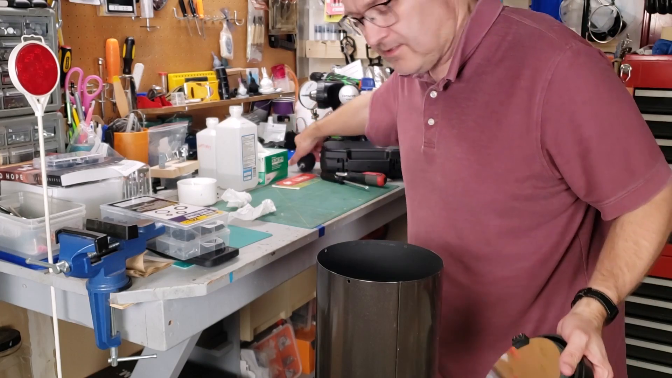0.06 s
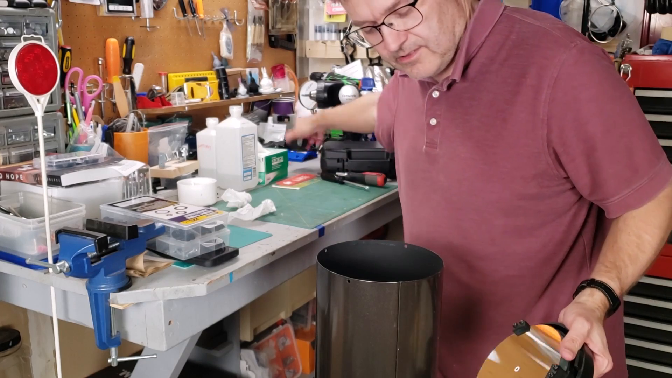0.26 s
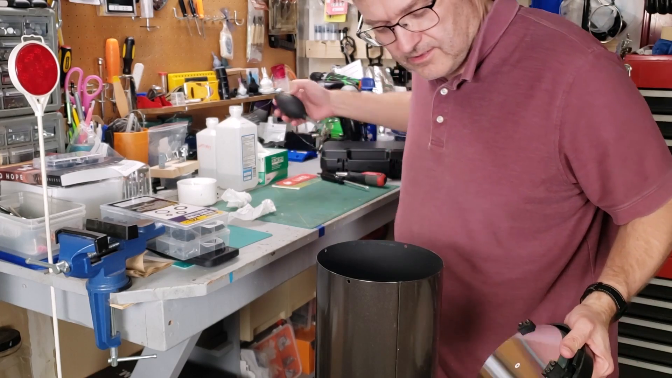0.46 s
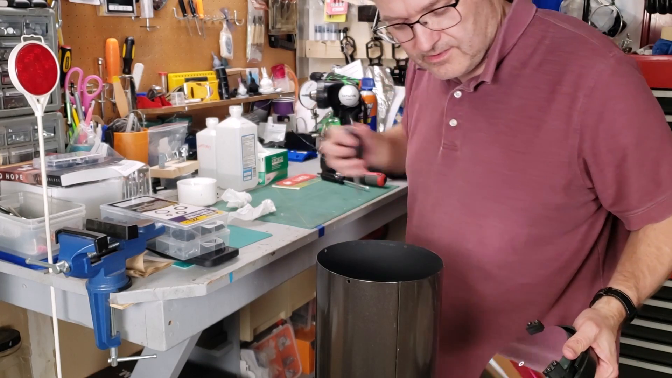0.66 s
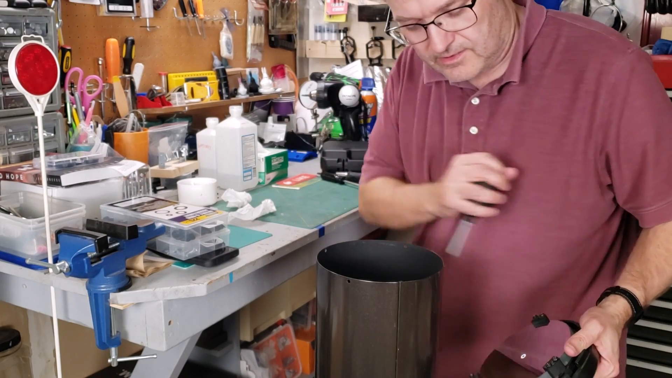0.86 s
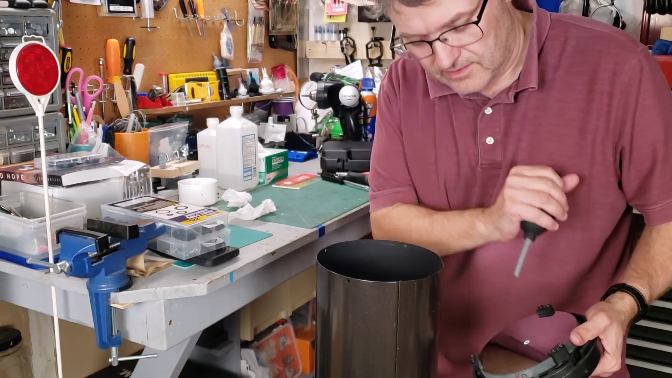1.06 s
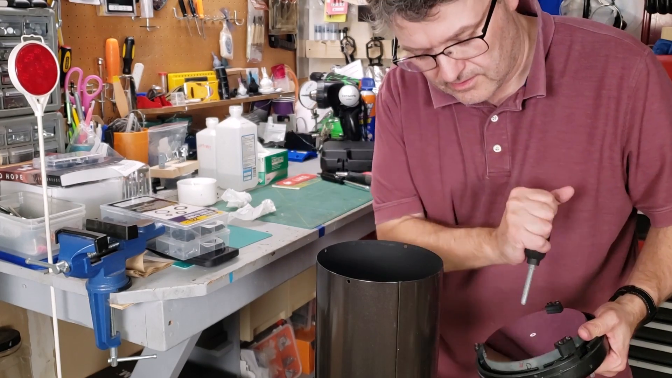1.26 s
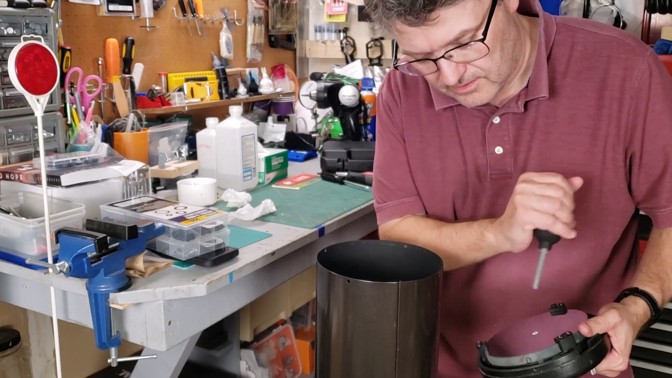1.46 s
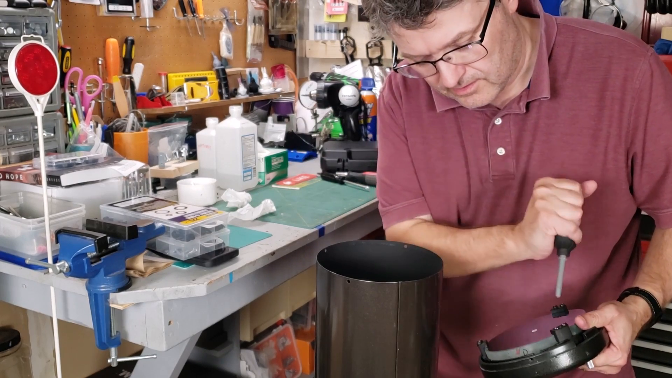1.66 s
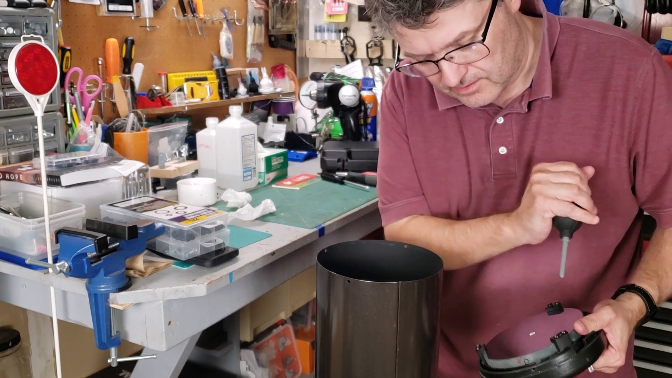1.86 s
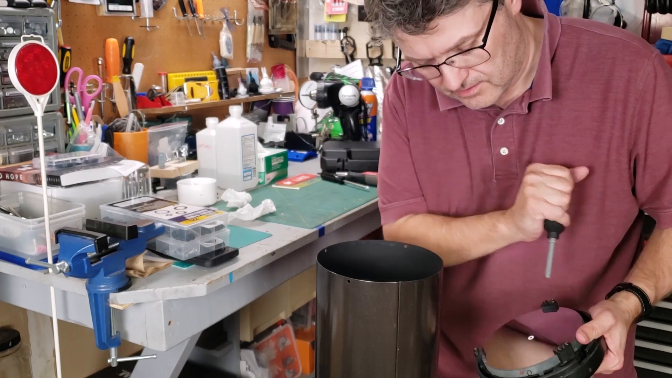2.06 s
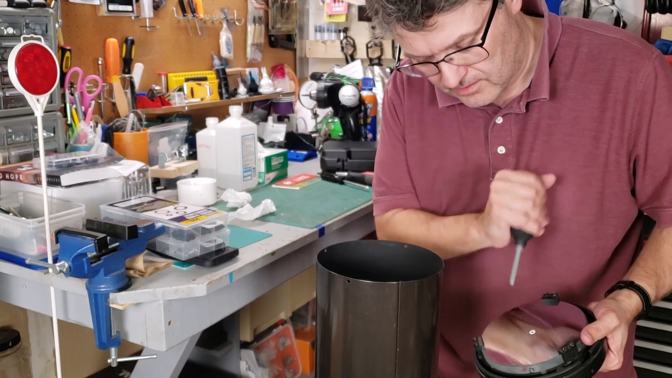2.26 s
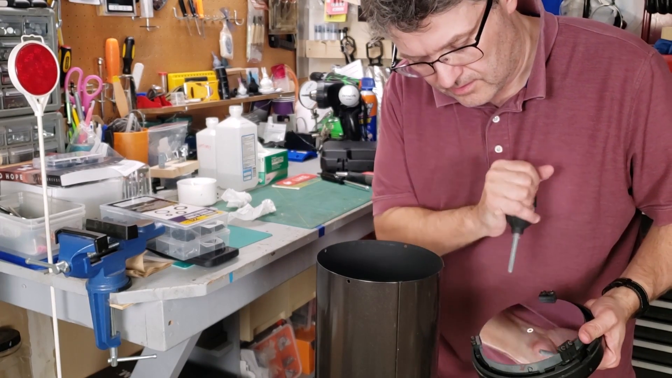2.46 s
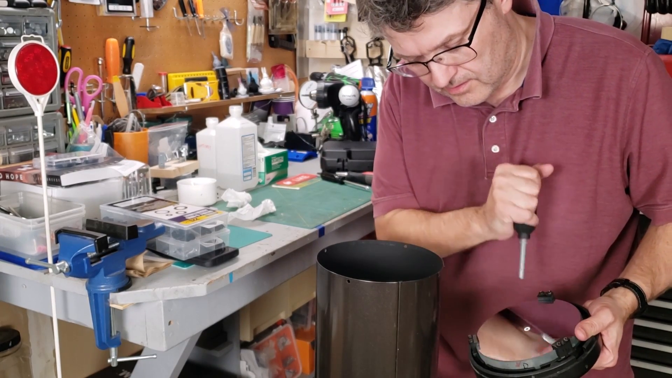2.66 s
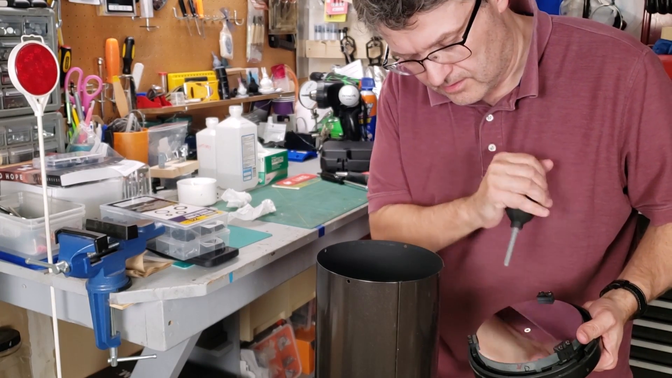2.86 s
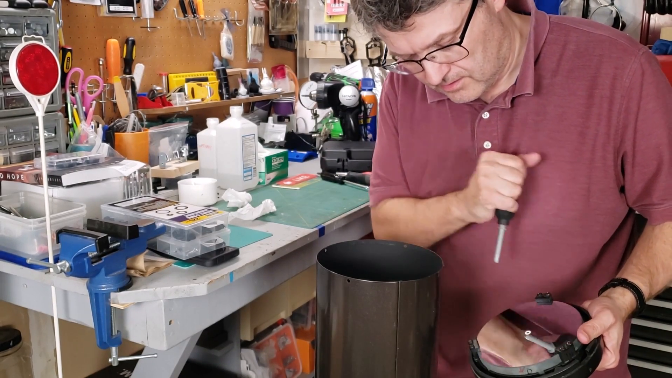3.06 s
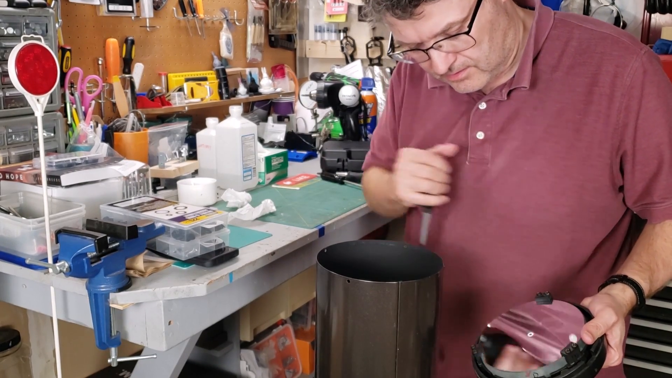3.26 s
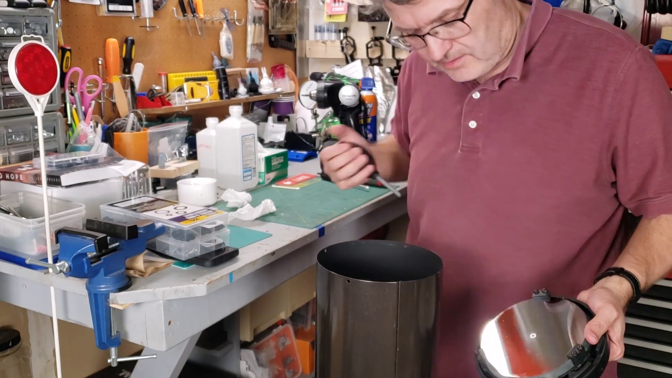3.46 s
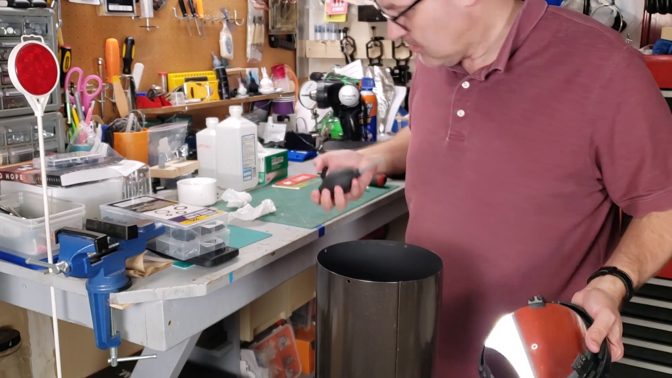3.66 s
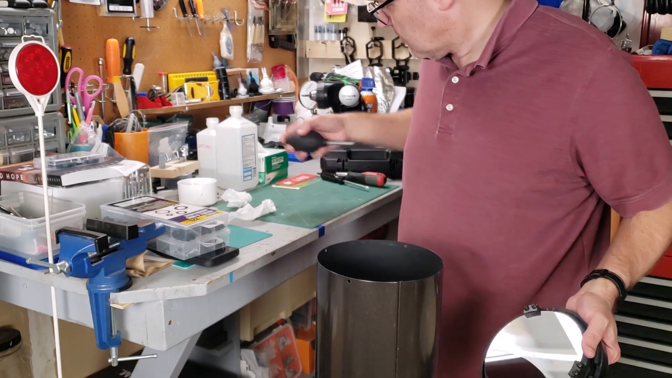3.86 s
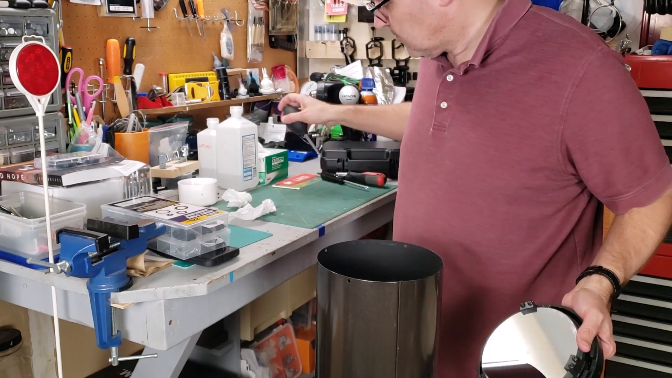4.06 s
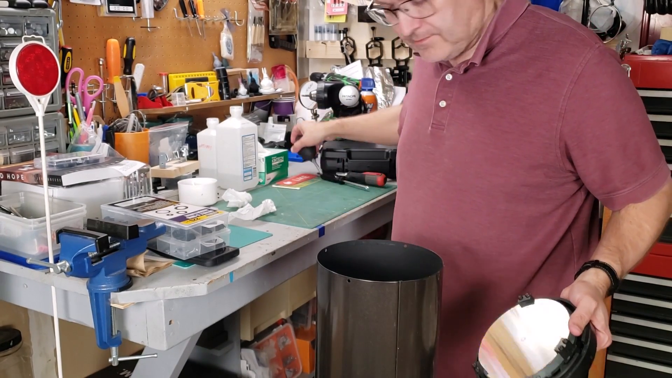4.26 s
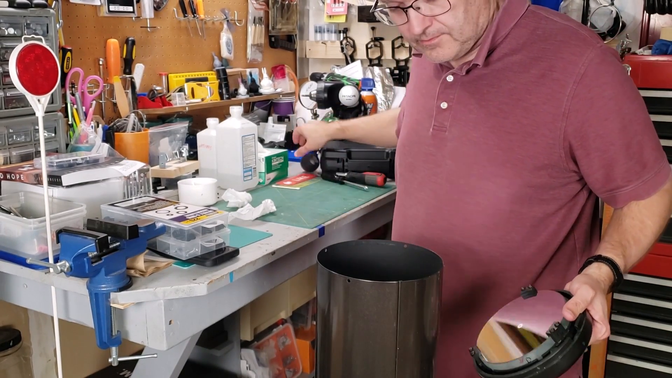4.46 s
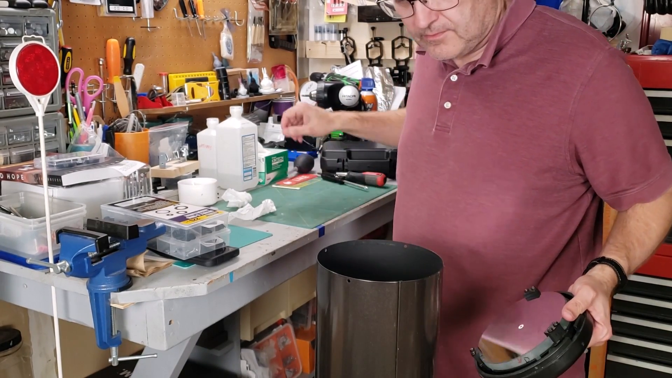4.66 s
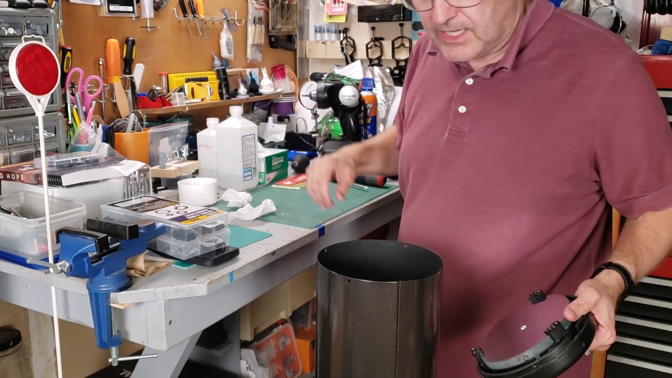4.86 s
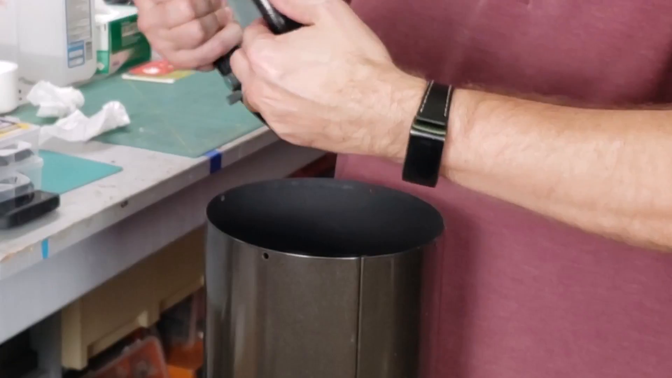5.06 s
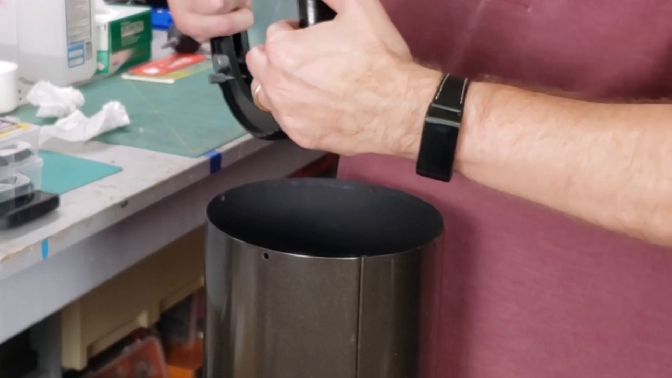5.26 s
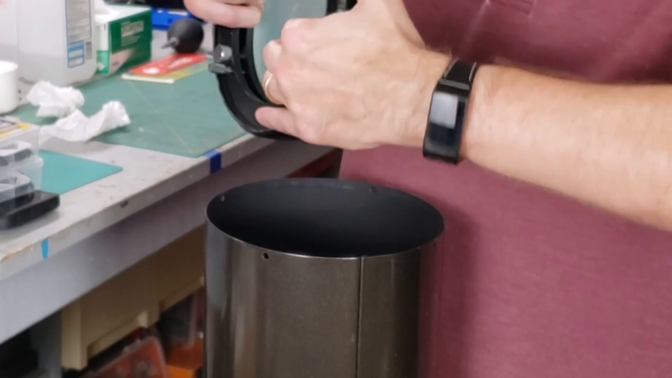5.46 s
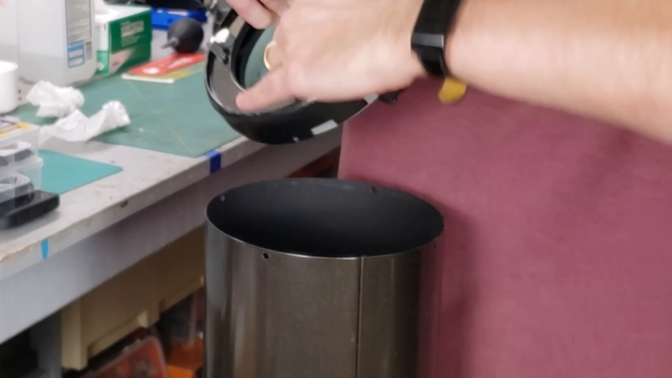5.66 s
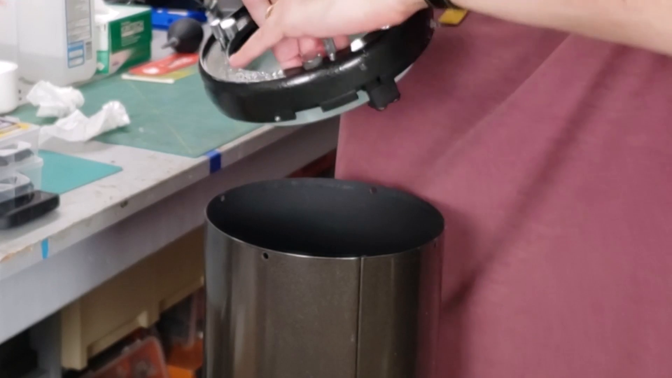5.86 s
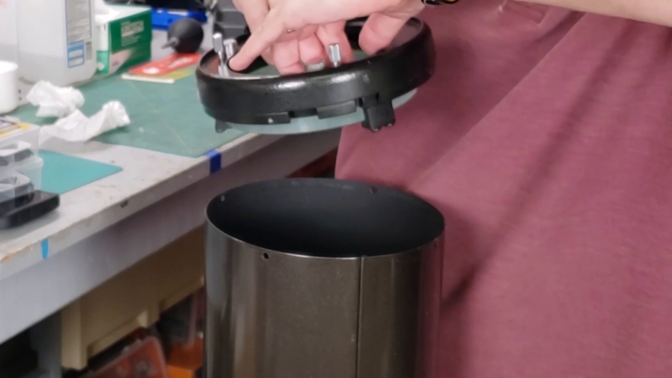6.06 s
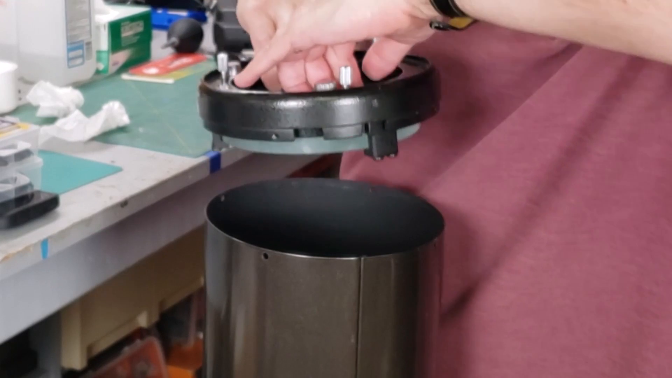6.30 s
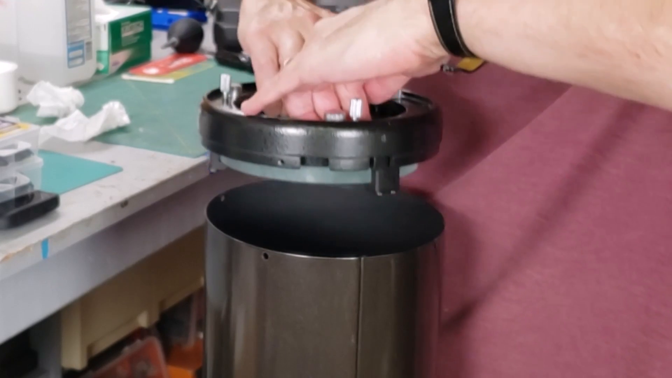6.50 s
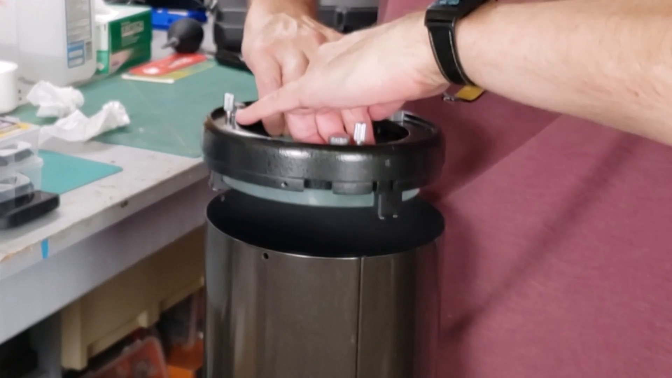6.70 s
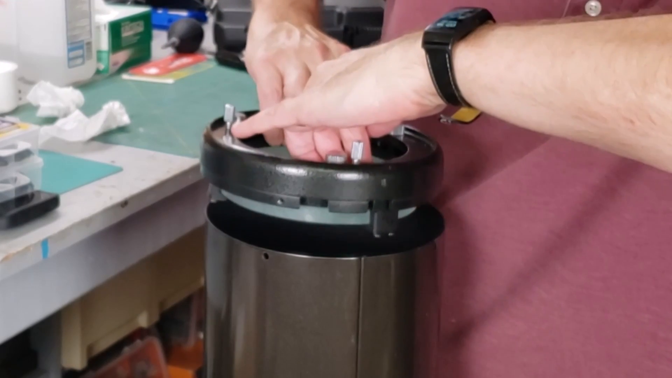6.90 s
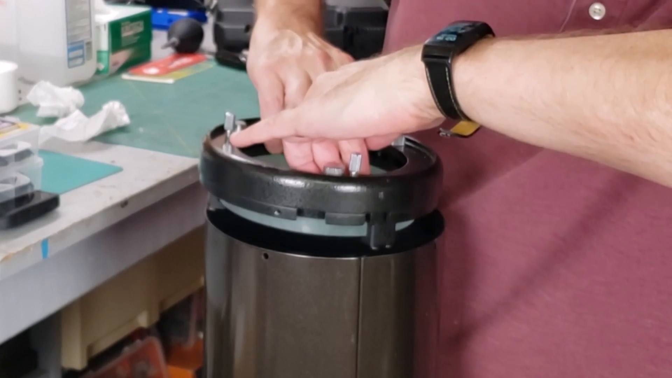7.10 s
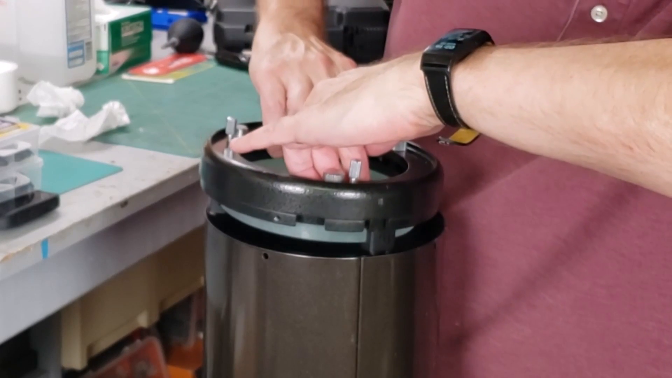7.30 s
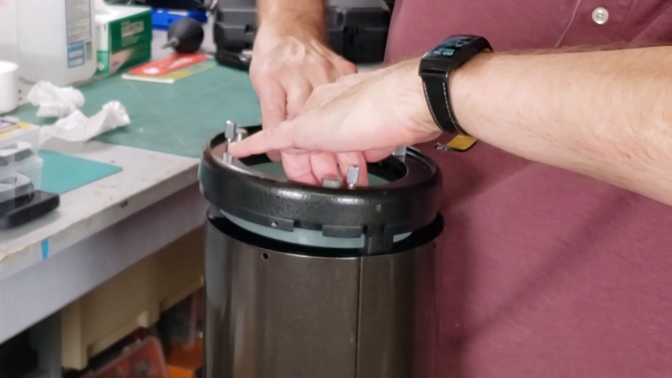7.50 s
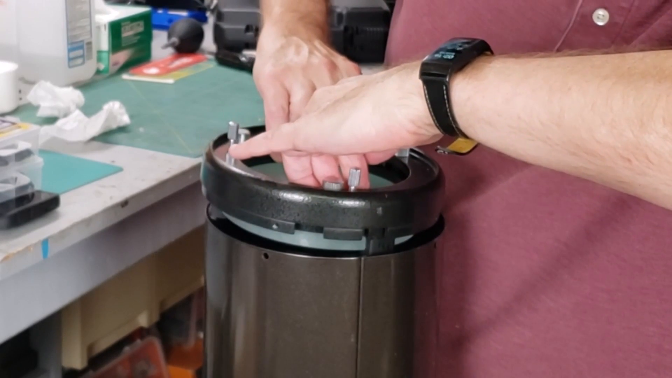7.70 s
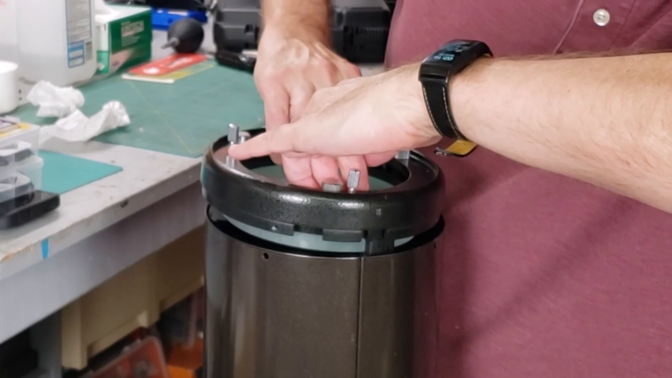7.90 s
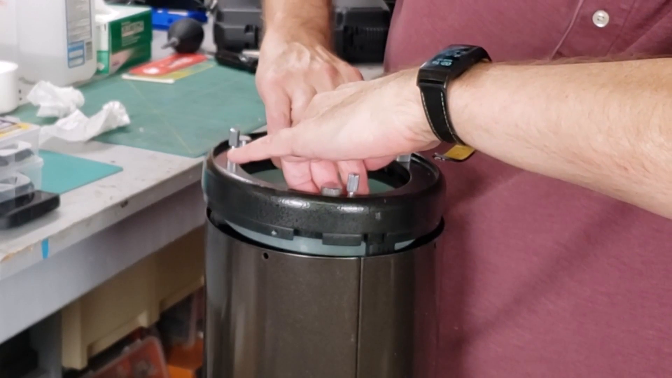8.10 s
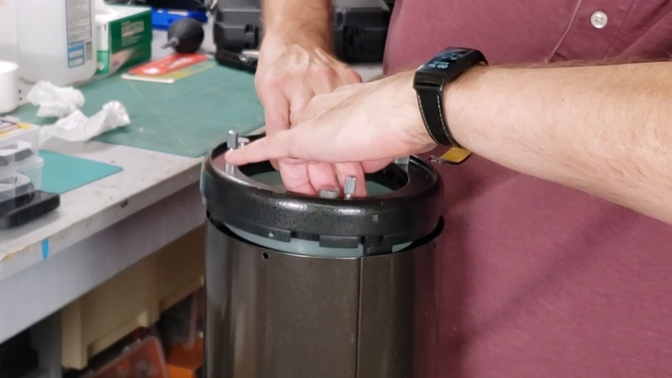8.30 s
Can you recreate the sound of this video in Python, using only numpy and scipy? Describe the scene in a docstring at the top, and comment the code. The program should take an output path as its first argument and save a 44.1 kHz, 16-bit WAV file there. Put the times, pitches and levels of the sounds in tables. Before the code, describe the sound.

In a quiet workshop, a squeezed blower whistles and hisses six times, clatters back onto the bench, and later a part rubs hollowly into a tube.

```python
"""A rubber air bulb is squeezed in quick puffs over a mirror, in stereo in a small, quiet workshop.
Each squeeze whistles as a wavering nozzle tone over jet noise; each refill is an arch of intake hiss.
Fetching it and putting it back knock on the bench: decaying modes, clacks and snaps, then a short slide.
Last, the mirror's holder rubs into a metal tube: scrape noise and the tube's resonances.
Every source reaches two microphones directly and by the room's echo, over a steady room tone."""
import sys
import numpy as np
from scipy import signal
from scipy.fft import rfft, irfft
from scipy.io import wavfile
from scipy.ndimage import uniform_filter1d, minimum_filter1d

SR = 44100
rng = np.random.default_rng(int(sys.argv[2]) if len(sys.argv) > 2 else 0)


def inscribe(sig):
    """Save sig as 16-bit PCM at rate SR to the path in sys.argv[1].

    A 1-D sig is mono; a 2-D sig holds one channel per row.
    Samples are clipped to [-1, 1] before scaling.
    """
    pcm = np.round(np.clip(np.atleast_2d(sig).T, -1, 1) * 32767)
    wavfile.write(sys.argv[1], SR, pcm.astype(np.int16))


N = 367794

# Source levels are set ahead of the microphone placing; levels in mode and colour tables are relative.
# echo decay of the shop: (frequency [Hz], time to fall 60 dB [s])
ECHO_DECAY = [(100, 0.9), (500, 0.23), (2000, 0.17), (4500, .31), (7000, 0.3), (15000, 0.19)]
# colour of the room tone: (frequency [Hz], level per Hz [dB])
ROOM_COLOUR = [(25, -11), (50, -1), (125, -3), (185, -16), (260, -19), (370, -18), (450, -22), (900, -21.5),
               (1250, -15), (1900, -19), (2900, -27), (8500, -38), (12000, -29.5), (16000, -27)]
# how alike the room tone is at left and right: (frequency [Hz], likeness [0-1])
LEFT_RIGHT_LIKENESS = [(40, .8), (300, .75), (900, 1), (2000, .2), (8000, .05)]
# knocks on the bench: (time [s], thump level [dB], ring level [dB], ring centre [Hz],
#   clack level [dB], clack top [Hz], snap level [dB])
BENCH_KNOCKS = [(.002, -37, -25, 410, -41.5, 1960, -90), (.022, -63, -21, 453, -44, 1500, -90),
                (0.058, -70, -37, 980, -48, 1200, -90), (4.31, -65, -52, 900, -47, 7500, -44.5),
                (4.359, -47, -47.5, 900, -51, 4000, -60), (4.445, -70, -41, 600, -36.5, 5400, -37.5),
                (4.4672, -65, -25.5, 913, -38.5, 4770, -49), (4.5227, -32, -29.5, 555, -45, 1500, -68),
                (4.5675, -35, -17.5, 960, -36.5, 1890, -63), (4.6404, -32.5, -18, 717, -36.5, 4570, -33),
                (4.7335, -70, -31.5, 862, -38, 4640, -46.5)]
# ringing of the bench and the things on it: (frequency [Hz], level [dB], time to fall 60 dB [s])
BENCH_MODES = [(255, -14, 0.26), (319, -10.5, 0.095), (349, -11.5, 0.13), (440, -5.5, 0.046),
               (493, 0.5, 0.014), (559, -2.5, 0.1), (647, -8.5, 0.18), (740, -5, 0.1), (828, -7.5, 0.1),
               (878, -3.5, 0.062), (968, -1.5, 0.042), (1190, 1, 0.045), (1234, -9, 0.079),
               (1513, -2, 0.091), (1736, -7.5, 0.079), (1953, -2, 0.026), (4240, -9, 0.045),
               (5170, -11, 0.04)]
# low bending modes of the bench top: (frequency [Hz], level [dB])
BENDING_MODES = [(58, -2), (72, 3.5), (104, -10), (140, -6.5)]
# the bulb sucks air back in: (time [s], length [s], peak hiss level [dB])
BULB_REFILLS = [(0.881, 0.1, -51.5), (1.215, 0.17, -19), (1.613, 0.17, -20.5), (1.943, .17, -27),
                (2.281, .18, -21.5), (2.612, 0.17, -20.5), (2.941, 0.15, -22)]
# colour of the intake hiss: (frequency [Hz], level per Hz [dB])
INTAKE_COLOUR = [(300, -20), (1500, -25.5), (3000, -15), (5500, -12.5), (7200, -10.5), (8500, -13),
                 (11000, -6), (14000, 0.5), (15800, -2)]
# hollow rush of unfolding rubber: (time of peak [s], half length [s], level [dB], centre [Hz])
RUBBER_UNFOLDS = [(1.301, 0.05, -44.5, 356), (1.693, 0.064, -31.5, 997), (2.371, 0.066, -44, 680),
                  (2.614, 0.011, -44.5, 270), (2.947, 0.0098, -40.5, 330), (3.017, 0.056, -43.5, 391.6)]
# squeezes: (time [s], length [s], whistle attack [s], time to full pressure [s], top pitch [Hz],
#   first whistle level [dB], time until it breaks up [s], later whistle level [dB], mid-squeeze jet level [dB])
BULB_SQUEEZES = [(1.396, 0.2, .026, 0.059, 7128, -18.5, 0.15, -23, -30),
                 (1.788, 0.1744, .038, .045, 7100, -16.5, 0.058, -18, -30.5),
                 (2.112, 0.18, .016, .043, 7054, -10.5, 0.081, -22, -31.5),
                 (2.455, 0.17, .018, 0.041, 7092, -13.5, 0.089, -20, -32.5),
                 (2.787, .160, .022, 0.05, 7103, -15, .042, -29, -31.5),
                 (3.101, 0.12, .018, 0.045, 7045, -9.5, 0.0602, -19, -29.5)]
# colour of the jet hiss: (frequency [Hz], level per Hz [dB])
JET_COLOUR = [(300, -20.5), (900, -26), (1800, -16.5), (2400, -12), (3300, -15), (4100, -15.5), (4800, -2),
              (6000, -22), (8000, -13.5), (9300, -5), (11000, -0.5), (13000, -6.5), (15800, -8)]
# side tones of the nozzle: (multiple of the whistle [ratio], level re jet [dB], flutter rate [Hz],
#   whistle pitch that favours it [Hz])
NOZZLE_SIDE_TONES = [(.338, -8.5, 34.92, 6800), (.40, -17, 69.5, 6960), (.655, -5.5, 60, 6790),
                     (0.659, -1.5, 60, 6898), (0.696, -4, 110, 7070), (1.335, -10.5, 60, 7070),
                     (1.561, -6, 69, 6800)]
# jumps to a higher tone under hard pressure: (time [s], length [s], mid pitch [Hz], level [dB])
HIGH_CHIRPS = [(1.563, 0.032, 9440, -14.5), (2.836, .056, 9344, -14)]
# falls to a lower tone on a weak flow: (time [s], length [s], mid pitch [Hz], level [dB])
LOW_CHIRPS = [(3.218, .044, 4395, -25.5), (3.362, 0.041, 4445, -22)]
# resonances of the slide over the bench: (frequency [Hz], width [Hz], level [dB])
SLIDE_RESONANCES = [(1880, 166, 1), (3920, 220, -12.5), (4960, 260, -18), (7070, 310, -16.5),
                    (12160, 13000, -25)]
# air column and wall of the tube: (frequency [Hz], width [Hz], level [dB])
TUBE_RESONANCES = [(137, 32.4, 1), (195, 35, 2.5), (239, 30, 2.5), (330, 73, 0), (405, 73, -3),
                   (587, 150, -8), (790, 120, -8.5), (870, 32, -2.5), (1247, 92, -13)]
# colour of the scrape at the tube: (frequency [Hz], level per Hz [dB])
SCRAPE_COLOUR = [(500, -26), (1200, 10), (2400, 10), (3500, -2), (6000, -16), (12000, -20)]

TIME = np.arange(N) / SR
FREQS = np.maximum(np.arange(N // 2 + 1) * SR / N, 1)
ROOM_TONE_DB = -58   # before the left-right tilt
# after each knock the thing rocks back once, softly; the delay varies a little
REBOUND_S, REBOUND_DB = 0.038, -17
REFILL_OPENING, REFILL_CLOSING = 1.67, 2.6   # exponents of the inflow's rise and fall
SLACK_HZ = 6688   # whistle pitch as the pressure runs out
PRESSURE_RISE_S, PRESSURE_FALL_S = .085, .07   # widths of the pressure hump, before and after its top
WHISTLE_RELEASE_S = .014
BREAK_S = 0.0073   # how fast a steady whistle breaks up
JET_ATTACK_S, JET_RELEASE_S, JET_SWELL_DB_PER_S = 0.019, 0.01, 14   # the jet grows as the bulb empties
HIGH_SAG_HZ_PER_S, LOW_SAG_HZ_PER_S = 500, 2200
TICK_AT_S, TICK_LENGTH_S, TICK_RISE_S, TICK_DB, TICK_FADE_DB_PER_S = 3.362, .035, 0.0086, -43.5, 438
SLIDE_AT_S, SLIDE_LENGTH_S, SLIDE_RISE_S, SLIDE_DB, SLIDE_FADE_DB_PER_S = 4.775, 0.23, 0.028, -41, 47.5
SEATING_AT_S, SEATING_LENGTH_S = 7.44, .36
SCRAPE_DB, SCRAPE_RISE_S, SCRAPE_FADE_DB_PER_S = -51.5, 0.026, 80
BOOM_DB, BOOM_RISE_S, BOOM_FADE_DB_PER_S = -45, 0.096, 81
CUTOFF_HZ = 15900   # top of the recorded band


def from_db(db):
    """Decibels to gain."""
    return 10 ** (np.asarray(db) / 20)


def rms_one(x):
    """Scale to rms 1."""
    return x / np.sqrt(np.mean(x ** 2) + 1e-20)


def at_hz(points, hz):
    """Read a table on a log-frequency axis."""
    points = np.array(points)
    return np.interp(np.log(hz), np.log(points[:, 0]), points[:, 1])


def butter(x, order, hz, kind):
    """Butterworth filter of a given kind."""
    return signal.sosfilt(signal.butter(order, hz, kind, fs=SR, output="sos"), x)


def lowpass(x, hz, order=2):
    """Butterworth low-pass."""
    return butter(x, order, min(hz, .45 * SR), "low")


def resonate(x, hz, width):
    """One resonance with gain 1 on top."""
    r = np.exp(-np.pi * width / SR)
    feedback = [1, -2 * r * np.cos(2 * np.pi * hz / SR), r * r]
    return signal.lfilter(np.array([1, 0, -1]) * (1 - r * r) / 2, feedback, x)


def noise(spectrum):
    """Noise of a given colour, rms 1."""
    return rms_one(irfft(rfft(rng.standard_normal(N)) * from_db(at_hz(spectrum, FREQS)), N))


def flutter(hz):
    """Random wavering up to a given rate, spread 1."""
    return rms_one(lowpass(rng.standard_normal(N), hz))


def stroke(s, length_s, attack_s, release_s):
    """Sample range of a gesture, the time since its start and its attack-hold-release gate."""
    span = slice(int(s * SR), int((s + length_s) * SR))
    t = TIME[span] - TIME[span.start]
    ramp = np.clip(np.minimum(t / attack_s, (t[-1] - t) / release_s), 0, 1)
    return span, t, np.sin(np.pi / 2 * ramp) ** 2


def push(s, length_s, db, rise_s, fade_db_per_s):
    """Gain over time of a rubbing movement: it builds up, then fades as the motion slows."""
    out = np.zeros(N)
    span, t, gate = stroke(s, length_s, 0.0052, 0.015)
    fade = from_db(db - fade_db_per_s * np.maximum(t - rise_s, 0))
    out[span] = gate * np.sqrt(np.minimum(t / rise_s, 1)) * fade
    return out


def rubbing(modes, grain_db):
    """Uneven friction exciting a few resonances, rms 1."""
    slips = rng.standard_normal(N) * from_db(grain_db * flutter(135))
    out = np.zeros(N)
    for k, (hz, width, db) in enumerate(modes):
        out += (-1) ** k * from_db(db) * resonate(slips, hz, width)
    return rms_one(out)


def room_response():
    """Stereo echo of the cluttered shop: dense reflections, thin in the bass, that die band by band."""
    t = TIME[:SR // 2]
    hz = np.maximum(np.arange(len(t) // 2 + 1) * SR / len(t), 1)
    white, out = rfft(rng.standard_normal((2, len(t)))), 0
    for k, (_, t60) in enumerate(ECHO_DECAY):
        share = at_hz([(f, float(j == k)) for j, (f, _) in enumerate(ECHO_DECAY)], hz)
        out = out + irfft(white * share, len(t)) * from_db(-60 * t / t60)
    onset = np.clip((t - .002) / 0.0027, 0, 1)
    out = out * onset * (1 + 1.8 * np.exp(-t / .012))   # near surfaces answer first
    out = butter(out, 2, 220, "high")
    return out / np.sqrt(np.sum(out ** 2, axis=1, keepdims=True))


def place(x, room, pan_db, wet_db, lag=0.):
    """Direct sound at two microphones (left later by lag samples) plus the room; bass echoes reach both alike."""
    shift = np.exp(-1j * np.pi * FREQS / SR * lag * np.array([[1], [-1]]))
    direct = irfft(rfft(x) * shift, N)
    shared = lowpass(room[0] - room[1], 500, order=1)
    echo = signal.fftconvolve(x[None], np.array([room[0], room[1] + shared]), axes=1)[:, :N]
    pan = from_db([[pan_db / 2], [-pan_db / 2]])   # positive is louder at left
    return (direct + from_db(wet_db) * echo) * pan / np.sqrt(1 + from_db(2 * wet_db))


def room_tone():
    """Low rumble, microphone hiss, the faint airy band of a fan and a little hum."""
    alike = np.clip(at_hz(LEFT_RIGHT_LIKENESS, FREQS), 0, 1)
    mid, side = rfft(noise(ROOM_COLOUR)), rfft(noise(ROOM_COLOUR))
    air = irfft(mid + np.sqrt((1 - alike) / (1 + alike)) * side * [[1], [-1]], N)
    fan = resonate(rng.standard_normal((2, N)), 1580, 400)
    fan = rms_one(resonate(fan, 1580, 400))
    hum = sum(from_db(db) * np.sin(2 * np.pi * hz * TIME)
              for hz, db in [(60, -74.5), (120, -69.5), (360, -76)])
    tilted = (from_db(ROOM_TONE_DB) * air + hum) * from_db([[1.8], [-1.8]])
    return tilted + fan * from_db([[-61.5], [-70]])


def knocks(thump_t60, clack_t60, snap_t60, crack_db, scatter_db, focus):
    """Each blow gives a bench thump, ringing modes, a clack of small things and a bright contact snap."""
    out, t = np.zeros(N + SR), TIME[:SR // 3]
    hz, mode_db, t60 = np.array(BENCH_MODES).T[:, :, None]
    crack = 1 + from_db(crack_db) * np.exp(-t / 0.0012)
    contact = (1 - np.exp(-t / .0004)) * (1 + np.exp(-t / .004))
    thump = sum(from_db(db) * np.sin(2 * np.pi * low_hz * t) for low_hz, db in BENDING_MODES)
    thump = thump * from_db(-60 * t / thump_t60) * (1 - np.exp(-t / 0.0082))
    for s, thump_db, ring_db, ring_hz, clack_db, clack_hz, snap_db in BENCH_KNOCKS:
        strength = from_db(mode_db + scatter_db * rng.standard_normal(hz.shape))
        # the struck spot favours some modes
        strength = strength / np.sqrt(1 + (focus * (hz / ring_hz - ring_hz / hz)) ** 2)
        modes = np.sin(2 * np.pi * (hz * t + rng.random(hz.shape))) * from_db(-60 * t / t60)
        ring = contact * np.sum(strength * modes, axis=0)
        grit, sharp = rng.standard_normal((2, len(t)))
        grit = resonate(grit, 2200, 6000)
        clack = rms_one(lowpass(grit, clack_hz, order=3)) * from_db(-60 * t / clack_t60) * crack
        snap = sharp * from_db(-60 * t / snap_t60) * crack
        body = from_db(ring_db) * ring + from_db(clack_db) * clack
        start = int(s * SR)
        back = int((s + REBOUND_S * rng.uniform(0.98, 1.1)) * SR)
        out[start:start + len(t)] += body + from_db(snap_db) * snap + from_db(thump_db) * thump
        out[back:back + len(t)] += from_db(REBOUND_DB) * body
    return out[:N]


def inflow():
    """Gain over time of the intake: a lopsided arch, quick to open and slower to die as the bulb fills."""
    out = np.zeros(N)
    for s, length_s, db in BULB_REFILLS:
        filled = np.clip((TIME - s) / length_s, 0, 1)
        arch = filled ** REFILL_OPENING * (1 - filled) ** REFILL_CLOSING
        out += from_db(db) * arch / arch.max()
    return out


def unfolding():
    """A short hollow rush each time the rubber springs back in the hand: noise through broad resonances."""
    out, air = np.zeros(N), rng.standard_normal(N)
    for s, half_s, db, hz in RUBBER_UNFOLDS:
        rush = rms_one(resonate(resonate(air, hz, .9 * hz), hz, 3.9 * hz))
        out += from_db(db) * np.exp(-2 * ((TIME - s) / half_s) ** 2) * rush
    return out


def squeezes():
    """A hump of pressure bends each firm, then broken whistle. Gives (span, gate, Hz, dB) each."""
    for s, length_s, attack_s, top_s, top_hz, firm_db, firm_s, broken_db, _ in BULB_SQUEEZES:
        span, t, gate = stroke(s, length_s, attack_s, WHISTLE_RELEASE_S)
        width_s = np.where(t < top_s, PRESSURE_RISE_S, PRESSURE_FALL_S)
        pressure = np.exp(-((t - top_s) / width_s) ** 2)
        broken = .5 + .5 * np.tanh((t - firm_s) / BREAK_S)
        hz = SLACK_HZ + (top_hz - SLACK_HZ) * pressure
        yield span, gate, hz, firm_db + (broken_db - firm_db) * broken


def whistle(notes, octave_db, jitter_hz, shimmer_db, lock_db):
    """Vortex tone of the nozzle: turbulence shakes a weak tone, a strong one locks in and runs clean."""
    out, shake, swell = np.zeros(N), flutter(180), flutter(52)
    for span, gate, hz, db in notes:
        loose = 1 / (1 + from_db(db - lock_db) ** 3)
        phase = 2 * np.pi * np.cumsum(hz + jitter_hz * loose * shake[span]) / SR
        level = from_db(db + shimmer_db * loose * swell[span])
        out[span] += gate * level * (np.sin(phase) + from_db(octave_db) * np.sin(2 * phase))
    return np.sqrt(2) * out


def outflow():
    """Gain over time of the jet: it swells slowly through each squeeze."""
    out = np.zeros(N)
    for s, length_s, *_, jet_db in BULB_SQUEEZES:
        span, t, gate = stroke(s, length_s, JET_ATTACK_S, JET_RELEASE_S)
        out[span] += gate * from_db(jet_db + JET_SWELL_DB_PER_S * (t - length_s / 2))
    return out


def fluttering_hiss(spectrum, flutter_db, count=14):
    """Jet noise of a given colour, its bands fluttering in level independently; rms 1."""
    edges = np.geomspace(1800, 16500, count)
    air = noise(spectrum)
    out = lowpass(air, edges[0], order=4)
    for low, high in zip(edges, edges[1:]):
        band = butter(np.roll(air, int(rng.integers(N))), 2, [low, high], "band")
        out = out + band * from_db(flutter_db * flutter(35))
    return rms_one(out)


def breathy_modes(reach_hz):
    """Breathy side tones glide with the whistle; each swells as the flow passes the speed that suits it."""
    out = np.zeros(N)
    for ratio, mode_db, width_hz, best_hz in NOZZLE_SIDE_TONES:
        band = flutter(width_hz) + 1j * flutter(width_hz)
        for span, _, hz, _ in squeezes():
            swell = 1 / (1 + ((hz - best_hz) / reach_hz) ** 2)
            carrier = np.exp(2j * np.pi * np.cumsum(ratio * hz) / SR)
            out[span] += swell * from_db(mode_db) * np.real(band[span] * carrier)
    return out


def chirps(rows, sag_hz_per_s, attack_s, release_s):
    """Short tones in another register of the nozzle, sagging in pitch. Gives (span, gate, Hz, dB) each."""
    for s, length_s, hz, db in rows:
        span, t, gate = stroke(s, length_s, attack_s, release_s)
        yield span, gate, hz - sag_hz_per_s * (t - length_s / 2), db


def nozzle_tick():
    """Gain over time of a faint tick of the nozzle as the grip on the bulb eases."""
    return push(TICK_AT_S, TICK_LENGTH_S, TICK_DB, TICK_RISE_S, TICK_FADE_DB_PER_S)


def bench_slide():
    """The bulb slides over the bench top and slows down: friction excites a few resonances."""
    motion = push(SLIDE_AT_S, SLIDE_LENGTH_S, SLIDE_DB, SLIDE_RISE_S, SLIDE_FADE_DB_PER_S)
    return motion * rubbing(SLIDE_RESONANCES, grain_db=4.0)


def tube_seating():
    """The holder rubs into the tube: a scrape at first touch, then friction makes the tube boom."""
    boom = push(SEATING_AT_S, SEATING_LENGTH_S, BOOM_DB, BOOM_RISE_S, BOOM_FADE_DB_PER_S)
    scrape = push(SEATING_AT_S, SEATING_LENGTH_S, SCRAPE_DB, SCRAPE_RISE_S, SCRAPE_FADE_DB_PER_S)
    return boom * rubbing(TUBE_RESONANCES, grain_db=-1.0) + scrape * noise(SCRAPE_COLOUR)


def scene():
    """Bulb, bench and tube in one room, each with its own balance of direct sound and echo."""
    room = room_response()
    bench = knocks(thump_t60=0.183, clack_t60=0.16, snap_t60=0.14, crack_db=9.5, scatter_db=1.0, focus=2.75)
    bench = bench + bench_slide()
    intake = (inflow() + nozzle_tick()) * noise(INTAKE_COLOUR) + unfolding()
    tone = whistle(squeezes(), octave_db=-12, jitter_hz=34.97, shimmer_db=3.5, lock_db=-10.5)
    jet = outflow() * (fluttering_hiss(JET_COLOUR, flutter_db=4.5) + breathy_modes(reach_hz=56.4))
    high_notes = chirps(HIGH_CHIRPS, HIGH_SAG_HZ_PER_S, attack_s=.011, release_s=0.027)
    high = whistle(high_notes, octave_db=-90, jitter_hz=22, shimmer_db=2.5, lock_db=-16.0)
    low_notes = chirps(LOW_CHIRPS, LOW_SAG_HZ_PER_S, attack_s=0.013, release_s=0.023)
    low = whistle(low_notes, octave_db=-18.0, jitter_hz=20, shimmer_db=3.5, lock_db=-14)
    return (room_tone()
            + place(bench, room, pan_db=4.5, wet_db=-0.5, lag=-1.06)
            + place(intake, room, pan_db=2.5, wet_db=3.5, lag=4.89)
            + place(tone, room, pan_db=4.0, wet_db=-4, lag=0.79)
            + place(jet, room, pan_db=0.0, wet_db=8, lag=0.72)
            + place(high, room, pan_db=-9.5, wet_db=-7.5, lag=0.8)
            + place(low, room, pan_db=2.5, wet_db=-3.5, lag=1.0)
            + place(tube_seating(), room, pan_db=6.5, wet_db=1, lag=1.1))


def record(dry):
    """A limiter holds the loudest moments under full scale; the top is cut steeply."""
    allowed = np.minimum(1, .93 / (np.abs(dry).max(axis=0) + 1e-9))
    gain = uniform_filter1d(minimum_filter1d(allowed, size=441), size=441)   # 10 ms windows
    return signal.sosfilt(signal.ellip(12, .1, 80, CUTOFF_HZ, fs=SR, output="sos"), dry * gain)


dry = scene()
out = record(dry)
inscribe(out)
```